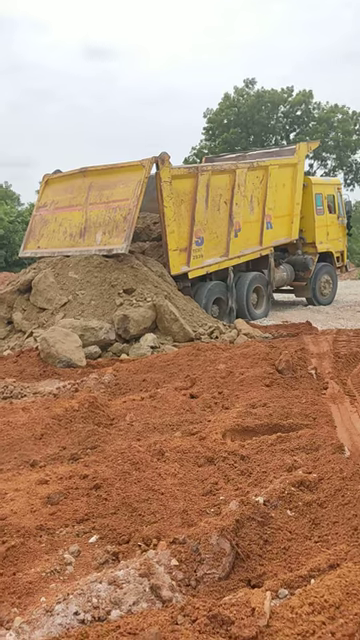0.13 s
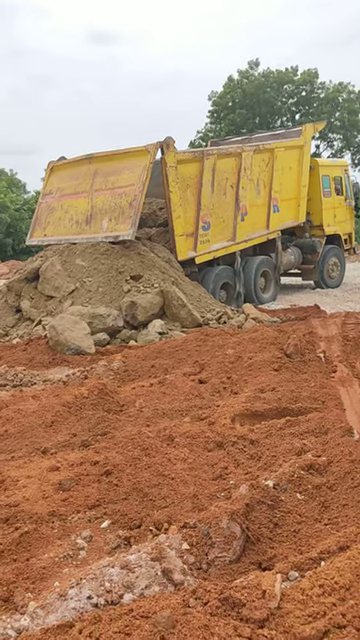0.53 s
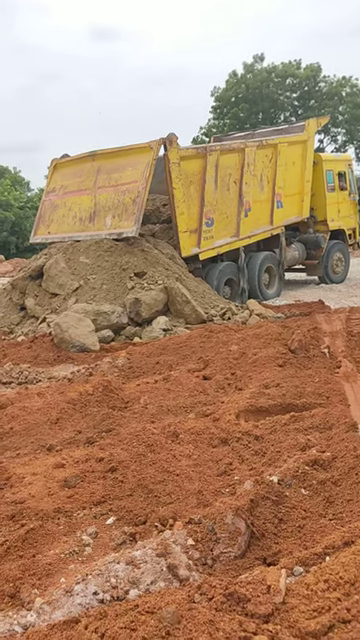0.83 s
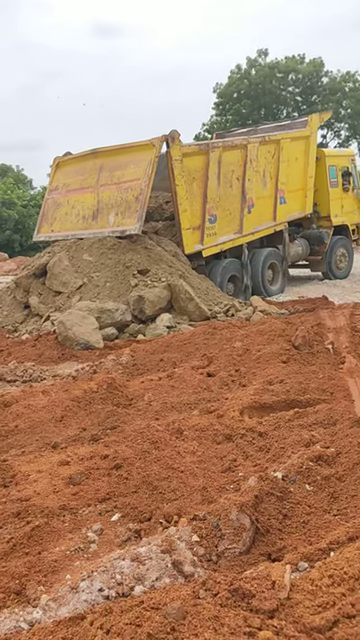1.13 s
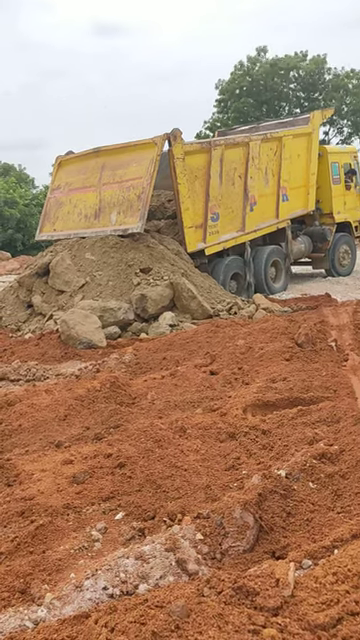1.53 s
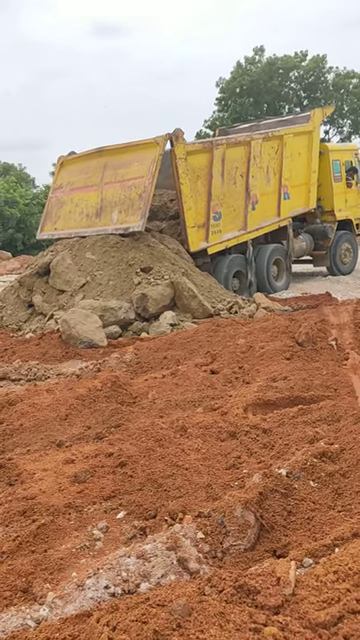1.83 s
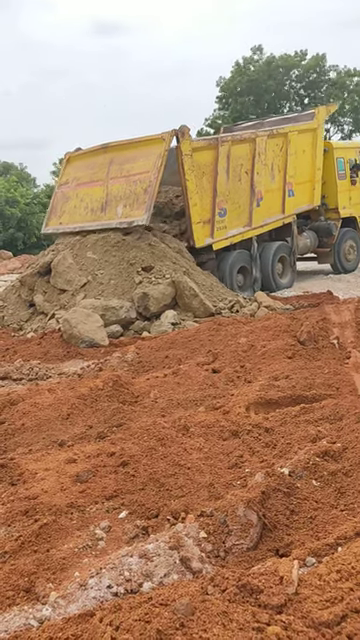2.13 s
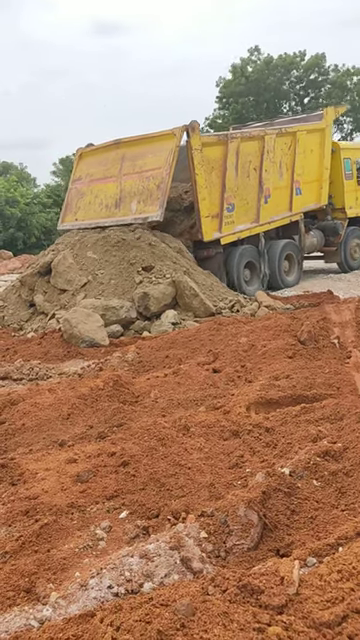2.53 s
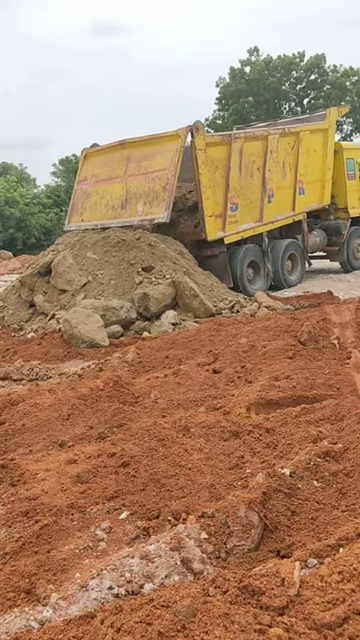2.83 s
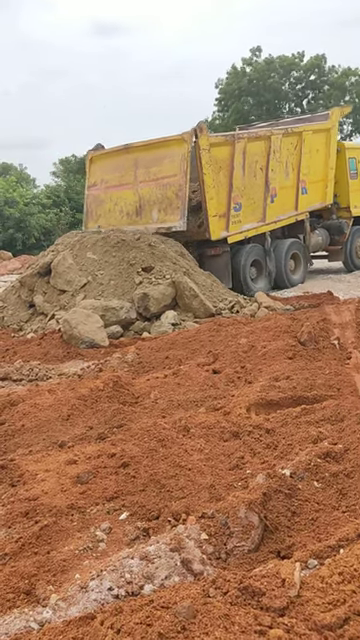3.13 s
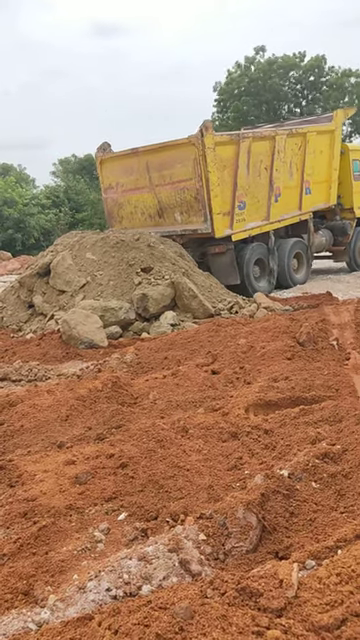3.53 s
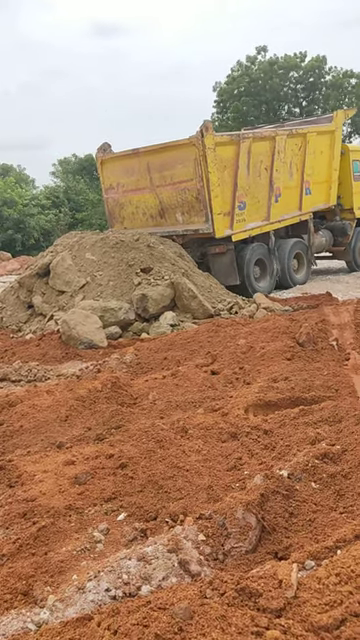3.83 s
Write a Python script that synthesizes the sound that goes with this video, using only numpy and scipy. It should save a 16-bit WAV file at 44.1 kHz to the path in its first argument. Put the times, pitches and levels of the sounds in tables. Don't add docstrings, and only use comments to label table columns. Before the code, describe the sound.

A dump truck's tailgate rattles and thumps dully on an earth heap, then slams and booms in its steel bed. A distant diesel idles throughout with faint air hiss; wind buffets the stereo phone microphone outdoors.

```python
import sys
import numpy as np
from scipy import signal
from scipy.fft import rfft, irfft, next_fast_len
from scipy.io import wavfile
from scipy.ndimage import uniform_filter1d, map_coordinates

SR = 44100
rng = np.random.default_rng(int(sys.argv[2]) if len(sys.argv) > 2 else 0)


def boost_factor(decibels):
    exponent = np.asarray(decibels, float) / 20
    return 10 ** exponent


def wav_out(sig):
    wavfile.write(sys.argv[1], SR, np.round(np.clip(np.atleast_2d(sig).T, -1, 1) * 32767).astype(np.int16))


N = 176400

# time in seconds, level in dB.
ENGINE_LOAD = [(0, -45.5), (.5, -43), (.7, -45.5), (1.1, -41.5), (1.25, -45), (1.33, -42.5), (1.4, -40.5),
               (1.62, -38.5), (1.9, -41), (2.2, -42), (2.5, -42.5), (2.95, -43.5), (3.36, -44.5),
               (4, -41.5)]
# pitch in Hz, width in Hz, level in dB.
ENGINE_BLOCK = [(800, 52, 16), (1150, 150, -5), (1494, 40, 23), (2600, 1200, -10)]
# pitch in Hz, level in dB per Hz.
ENGINE_COLOUR = [(120, 9), (400, -2.5), (900, 1), (1500, -0.5), (2900, -3), (3600, -10), (5000, -10),
                 (9000, -12.5)]
# pitch in Hz, level in dB per Hz.
BREEZE_COLOUR = [(12, -38), (30, 4), (100, -7.5), (200, -6), (400, -18.5), (800, -22.5), (1500, -43)]
# start in seconds, length in seconds, level in dB, flutter pitch in Hz.
LEFT_GUSTS = [(0, 0.2, -26.5, 119), (0.301, 0.13, -29.5, 255), (0.439, 0.2, -26.5, 140),
              (0.666, 0.077, -25, 169), (.76, .08, -31, 200), (1.329, 0.103, -32, 190),
              (1.577, 0.067, -26, 115), (1.869, 0.21, -16.5, 146), (2.105, 0.12, -23.5, 101),
              (2.222, 0.37, -16, 160), (2.613, 0.1626, -15, 145), (2.782, 0.185, -21, 152),
              (2.958, 0.163, -29.5, 167), (3.132, 0.89, -20, 143), (3.595, .4, -22, 105.3)]
# start in seconds, length in seconds, level in dB, flutter pitch in Hz.
RIGHT_GUSTS = [(0.171, 0.1, -30, 204), (.45, 0.12, -26.5, 198), (1.26, 0.036, -29.5, 150),
               (1.421, 0.046, -33.5, 194), (1.688, 0.03, -28.5, 194), (1.758, 0.041, -23, 255),
               (1.9, 0.031, -18, 148), (2.109, 0.12, -27.5, 183), (2.5, .37, -25.5, 180),
               (2.59, 0.062, -28, 480), (2.83, .1, -27.5, 425), (2.882, 0.055, -16, 235),
               (2.969, 0.095, -26, 216), (3.198, 0.19, -28.5, 151)]
# start in seconds, length in seconds, level in dB.
AIR_LEAKS = [
    (.3, 0.19, -54),
    (0.87, 0.33, -46.5),
    (1.338, 0.56, -45.5),
    (1.895, 0.23, -42.5),
    (2.15, .3, -50),
]
# start in seconds, level in dB,
# time to fade by 60 dB in seconds, pitch of the bright hump in Hz, level of the broad noise in dB.
LOOSE_CONTACTS = [(2.342, -34, 0.065, 7060, 6), (2.429, -39, 0.2, 3960, -24), (2.5, -40, 0.19, 5360, -22),
                  (2.567, -20, 0.11, 5700, -9), (2.575, -22, 0.1, 5470, 9), (2.596, -33, .2, 4900, -2),
                  (2.626, -26, 0.13, 6000, 2), (2.641, -26.5, 0.12, 4800, 4), (2.654, -33, 0.17, 4170, -1),
                  (2.697, -30.5, 0.13, 3670, 3), (2.82, -28.5, 0.15, 5200, -7),
                  (2.827, -27.5, .13, 5030, -5), (2.865, -35, 0.3, 5170, -6),
                  (3.39, -34.5, 0.088, 7800, -24), (3.41, -34, 0.2, 7200, -17),
                  (3.451, -19, 0.09, 7800, -10), (3.466, -35, 0.075, 7600, -23),
                  (3.488, -27, 0.073, 7860, -11), (3.553, -26, 0.3, 7800, -5.5),
                  (3.606, -27.5, 0.31, 7800, -11), (3.798, -25.5, 0.17, 7640, 4),
                  (3.807, -19.5, 0.21, 7460, 3.5), (3.863, -27, 0.15, 7050, -1)]
# start in seconds, level in dB,
# time to fade by 60 dB in seconds, pitch in Hz.
EARTH_KNOCKS = [
    (2.487, -37, .1, 700),
    (2.573, -29.5, .15, 756),
    (2.61, -42, .1, 800),
    (2.65, -27.5, 0.26, 670),
    (2.692, -39, 0.14, 710),
    (2.827, -22, 0.065, 690),
    (2.86, -30, 0.11, 600),
    (2.9, -30, 0.1, 744),
    (2.951, -30, .08, 700),
]
# start in seconds, level in dB, then the levels in dB
GATE_BLOWS = [
    (3.407, -23.5, -14.5, -18, -30),
    (3.466, -11.5, -13.5, 3, -5),
    (3.5, -23, -23, -5, -23),
    (3.56, -20.5, -6, -32, -22),
    (3.63, -24.5, 2, -40, -20),
    (3.71, -27, -1.5, -38, -22),
    (3.8, -26.5, -14, -14, 17.5),
]
# pitch in Hz, level in dB per Hz.
BED_COLOUR = [(50, -24), (120, 11.5), (300, -5.5), (600, -5.5), (920, -16), (1100, -12.5), (2500, -16.5),
              (3500, -25), (5500, -26), (9000, -27)]
# pitch in Hz, time to fade by 60 dB in seconds.
BED_FADE = [(60, 1.26), (300, 1.22), (800, 0.94), (1200, 1.04), (2500, 0.7), (5000, 0.82), (8000, 1)]
# pitch in Hz, build-up in seconds.
BED_BUILD_UP = [(60, 0.22), (250, 0.067), (700, 0.001), (2500, 0.00067)]
# pitch in Hz, level in dB,
# time to fade by 60 dB in seconds, second channel as a multiple of the first.
PANEL_TONES = [(157, -10, 1, .4), (205.6, 1.5, 0.97, .4), (236.5, -2, 5.9, 1.2), (255, -3, 1.2, 0.86),
               (286, 6, 0.87, .4), (395.2, 2.5, 0.8, -.8), (445, 2.5, 0.56, -1.3), (608, -5, 1.1, -.6),
               (656, -4.5, 1.6, -0.14), (716, 0, 0.99, -0.086), (770, -1, 0.38, 0.28),
               (817, -1.5, 0.95, 1.2), (875, -5.5, 1.04, 1.5), (910, -20.5, 0.87, -0.33)]
# pitch in Hz, level in dB.
LEFT_PORT_COLOUR = [(500, 1.5), (900, 5), (3500, 1), (5000, -2), (6200, -12), (8600, 8), (9800, -10.5),
                    (15000, -40)]
# pitch in Hz, level in dB.
RIGHT_PORT_COLOUR = [(3000, 1.5), (6000, 6), (7000, 9.5), (7650, 16.5), (8300, 10), (9100, 2.5),
                     (9800, -14.5), (15000, -24.5)]
# pitch in Hz, likeness from 0 to 1.
PORT_LIKENESS = [(100, 0.89), (700, 0.62), (1600, 1), (2400, 0.12), (6000, 0.076), (9000, 0.12)]


def unit(x):
    return x / np.sqrt(np.mean(x ** 2, axis=-1, keepdims=True) + 1e-20)


def along(points, hz):
    f, value = np.transpose(points)
    return np.interp(np.log(hz + 1), np.log(f + 1), value)


def wobble(rate):
    knots = rng.standard_normal(int(N * rate / SR) + 4)
    return map_coordinates(knots, [np.arange(N) * rate / SR])


def filtered(x, response):
    n = x.shape[-1]
    m = next_fast_len(n + 8192)
    return irfft(rfft(x, m) * response(np.fft.rfftfreq(m, 1 / SR)), m)[..., :n]


def peak(f, hz, width):
    return 1j * f * width / (hz * hz - f * f + 1j * f * width + 1e-9)


def dull(f):
    return 1 / (1 + (f / 9400) ** 20)


def add(track, s, sound):
    part = track[..., max(round(s * SR), 0):][..., :sound.shape[-1]]
    part += sound[..., :part.shape[-1]]


def engine():
    firing_hz, first_s = 26.25, .022
    knock_t60, knock_share, block_db = .13, .36, -19
    cylinder_db = np.array([3, -1, 0, -1])
    t = np.arange(N) / SR
    turn = (t - first_s) * firing_hz + 4 + .03 * wobble(3)
    count = turn.astype(int)
    uneven_db = rng.normal(0, 1.2, 200)[count] * .6
    size = boost_factor(cylinder_db[count % 4] + uneven_db)
    flare = size * boost_factor(-60 * (turn % 1) / firing_hz / knock_t60)
    noise = rng.standard_normal((2, 2, N))

    flaring = noise[0] * (1 + knock_share * unit(flare))
    roar = filtered(flaring, lambda f: boost_factor(along(ENGINE_COLOUR, f)))
    hard_knock = noise[1] * flare * (count % 4 == 0)
    ring = filtered(hard_knock, lambda f: sum(boost_factor(db) * peak(f, hz, width) for hz, width, db in ENGINE_BLOCK))
    load_db = np.interp(t, *np.transpose(ENGINE_LOAD)) + 0.24 * wobble(6.42)
    return boost_factor(load_db + 6) * (unit(roar) + boost_factor(block_db) * unit(ring))


def wind():
    edge_s, flutter_q, heave_db = 0.0091, 1.55, -5
    breeze_db, skew_each = np.array([-28.5, -30]), [0.089, 0.017]
    out = unit(filtered(rng.standard_normal((2, N)), lambda f: boost_factor(along(BREEZE_COLOUR, f))))
    sway = np.array([wobble(14), wobble(9.16)])
    out = out * boost_factor(breeze_db[:, None] + 1.6 * sway)
    t = np.arange(SR // 2) / SR
    for port, gusts, skew in zip(out, (LEFT_GUSTS, RIGHT_GUSTS), skew_each):
        lumps = boost_factor(1.16 * wobble(29.74) + 2.15 * wobble(8.214))
        for s, length, db, hz in gusts:
            def flutter(f):
                return peak(f, hz, hz / flutter_q) * peak(f, hz, 3 * hz) / (1 + 1j * f / 900)

            air = unit(filtered(rng.standard_normal(len(t)), flutter))
            air = unit(np.tanh(0.2 * air))
            air = air - skew * (air ** 2 - 1)
            heave = filtered(rng.standard_normal(len(t)),
                             lambda f: peak(f, 72, 31.0) / (1 + 1j * f / 200) ** 2)
            air += boost_factor(heave_db) * unit(heave)
            edge = np.clip(np.minimum(t, (length + edge_s - t) / 1.32) / edge_s, 0, 1)
            air = air * np.resize(lumps[max(round(s * SR), 0):], len(t))
            add(port, s, boost_factor(db) * edge * air / np.std(air[t < length]))
    return out


def hisses():
    t = np.arange(N) / SR
    level = np.zeros(N)
    for s, length, db in AIR_LEAKS:
        swell, shut = (t - s) / 0.11, (s + length - t) / 0.032
        level += boost_factor(db) * np.clip(np.minimum(swell, shut), 0, 1)
    noise = rng.standard_normal((2, N))
    return level * unit(filtered(noise, lambda f: peak(f, 11800, 5000) + 0.33 * peak(f, 2200, 2100)))


def rattles():
    rise_s, hump_q, grit_db = 0.0032, 2.24, 1.1
    out, t = np.zeros((2, N)), np.arange(SR // 4) / SR
    for s, db, t60, hz, wide_db in LOOSE_CONTACTS:
        def colour(f):
            hump = peak(f, hz, hz / hump_q) ** 3
            return dull(f) * (hump + boost_factor(wide_db) * peak(f, 2250, 3000))

        lumps = uniform_filter1d(rng.standard_normal(len(t)), size=80)
        grit = boost_factor(grit_db * unit(lumps))
        noise = unit(filtered(rng.standard_normal((2, len(t))), colour))
        add(out, s, noise * grit * boost_factor(db - 60 * t / t60) * (1 - np.exp(-t / rise_s)))
    return out


def knocks():
    hump_q, rise_s = 3.9, .003
    out, t = np.zeros((2, N)), np.arange(SR // 4) / SR
    for s, db, t60, hz in EARTH_KNOCKS:
        noise = rng.standard_normal((2, len(t)))
        puff = unit(filtered(noise, lambda f: peak(f, hz, hz / hump_q) ** 2))
        add(out, s, puff * boost_factor(db - 60 * t / t60) * (1 - np.exp(-t / rise_s)))
    return out


def bed_roar(t):
    clatter_db = 2
    noise = rng.standard_normal((2, len(t)))
    hz, u, z = signal.stft(noise, SR, nperseg=256, noverlap=192)
    level_db = along(BED_COLOUR, hz)[:, None] - 60 * u / along(BED_FADE, hz)[:, None]
    shape = boost_factor(level_db) * (1 - np.exp(-u / along(BED_BUILD_UP, hz)[:, None]))
    lumps = uniform_filter1d(rng.standard_normal(shape.shape), size=9, axis=0)
    lumps = uniform_filter1d(lumps, size=5, axis=1)
    shape = shape * dull(hz)[:, None] * boost_factor(clatter_db * unit(lumps))
    return signal.istft(z * shape, SR, nperseg=256, noverlap=192)[1][:, :len(t)] * 8


def panel_ring(t):
    drifts = np.cumsum(rng.standard_normal((len(PANEL_TONES), len(t))), axis=1) * 0.033
    ring = np.zeros((2, len(t)))
    for (hz, db, t60, lean), drift in zip(PANEL_TONES, drifts):
        level = boost_factor(db + rng.normal(0, 0.75) - 60 * t / t60)
        level = level * (1 - np.exp(-t / along(BED_BUILD_UP, hz)))
        tone = np.sin(2 * np.pi * hz * t + drift * np.sqrt(hz / 400))
        ring += np.array([[1], [lean]]) * level * tone
    return ring


def impact_crack(t, crack_db):
    sizzle_db, sizzle_t60 = 2.5, 0.27
    snap = rng.standard_normal((2, len(t))) * boost_factor(crack_db - 60 * t / 0.018)
    crack = filtered(snap, lambda f: 4.1 * peak(f, 2500, 670) + 1.0 * peak(f, 750, 430))
    fizz = rng.standard_normal((2, len(t))) * boost_factor(crack_db + sizzle_db - 60 * t / sizzle_t60)
    sizzle = filtered(fizz, lambda f: 4 * peak(f, 14500, 7000) ** 2)
    return crack + sizzle * np.clip(np.minimum(t / .012, (.1 - t) / .02), 0, 1)


def slams():
    thud_hz, thud_t60 = 56.6, 0.25
    out, t = np.zeros((2, N)), np.arange(SR * 3 // 5) / SR
    for s, db, panel_db, crack_db, thud_db in GATE_BLOWS:
        thud = boost_factor(thud_db - 60 * t / thud_t60) * (1 - np.exp(-t / 0.024))
        thud = thud * np.sin(2 * np.pi * thud_hz * t) * [[1], [.4]]
        body = bed_roar(t) + boost_factor(panel_db) * panel_ring(t) + thud
        add(out, s, boost_factor(db) * (body * np.minimum(t / 0.002, 1) + impact_crack(t, crack_db)))
    return out


def ports(pair):
    lag_s = .00018

    def blend(f):
        angle = np.arccos(np.clip(along(PORT_LIKENESS, f), 0, 1)) / 2
        return np.array([np.cos(angle), np.sin(angle)])

    def colour(f):
        level = boost_factor([along(LEFT_PORT_COLOUR, f), along(RIGHT_PORT_COLOUR, f)])
        return level * np.exp(-1j * np.pi * f * lag_s * np.array([[1], [-1]]))

    mid, side = filtered(pair, blend)
    return filtered(np.array([mid + side, mid - side]), colour)


def scene():
    truck = engine() + hisses() + rattles() + knocks() + slams()
    return ports(truck) + wind()


def band_limit(x):
    return signal.sosfilt(signal.butter(12, 15660, fs=SR, output="sos"), x)


def record(dry):
    mix = dry / (1 + np.abs(dry) ** 6) ** (1 / 6)
    return band_limit(mix)


dry = scene()
out = record(dry)
wav_out(out)
```